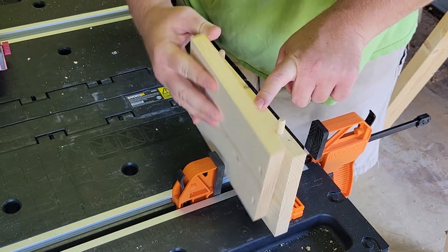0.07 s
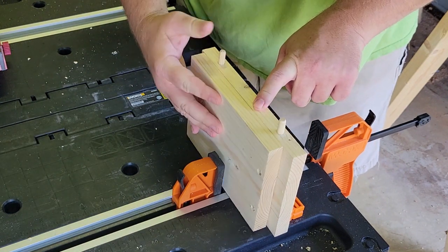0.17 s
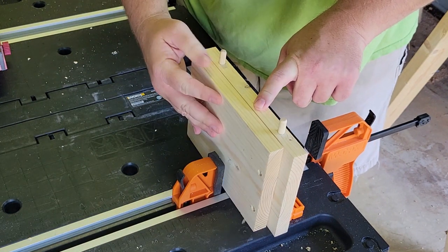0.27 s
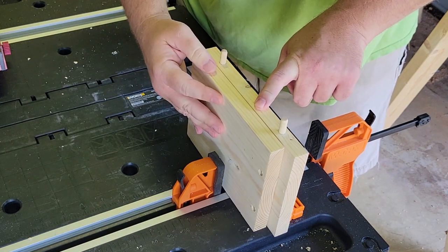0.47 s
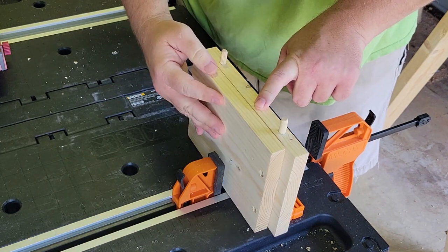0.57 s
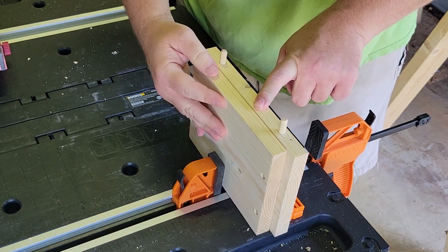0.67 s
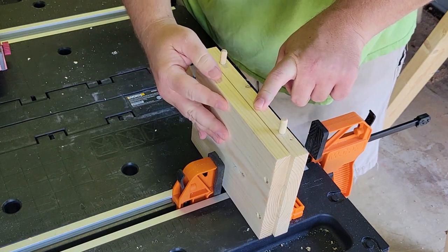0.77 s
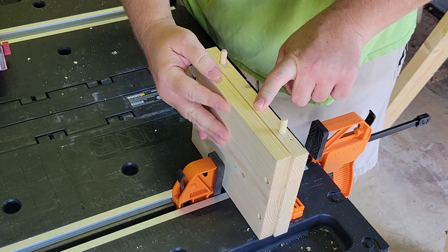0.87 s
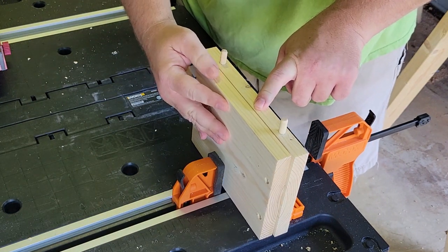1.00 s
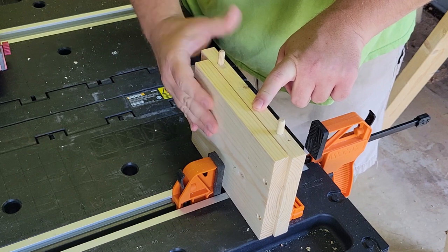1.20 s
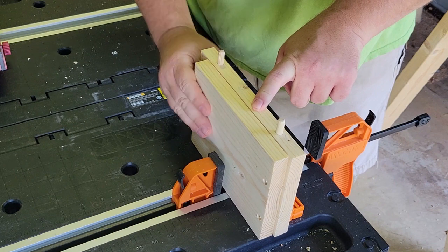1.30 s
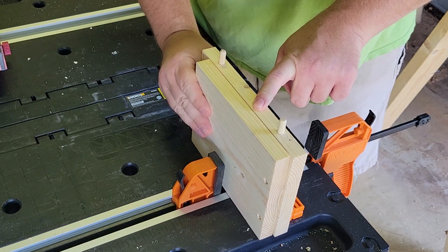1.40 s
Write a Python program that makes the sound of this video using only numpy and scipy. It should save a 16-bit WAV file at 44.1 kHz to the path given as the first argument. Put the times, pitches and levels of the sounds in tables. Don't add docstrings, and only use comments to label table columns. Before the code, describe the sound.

Wood knock: a softwood board slides briefly, hits on its corner, then claps flat on a bench

```python
import sys
import numpy as np
from scipy import signal
from scipy.fft import rfft, irfft
from scipy.io import wavfile
from scipy.ndimage import uniform_filter1d

SR = 44100
rng = np.random.default_rng(int(sys.argv[2]) if len(sys.argv) > 2 else 0)


def linear_from_db(decibels):
    return 10 ** (np.asarray(decibels, float) / 20)


def to_wav(sig):
    pcm = np.clip(np.atleast_2d(sig), -1, 1) * 32767
    pcm = np.round(pcm).astype(np.int16)
    wavfile.write(sys.argv[1], SR, pcm.T)


N = 63945

# frequency in Hz, likeness [0-1].
AIR_LIKENESS = [(60, 1), (240, 0.41), (950, 0.078), (3770, 0.0071), (15000, 1)]


def evened(x):
    return x / np.sqrt(np.mean(x ** 2) + 1e-20)


def read(points, hz):
    f, value = np.transpose(points)
    return np.interp(np.log(hz + 1), np.log(f + 1), value)


def curve(points):
    return linear_from_db(np.interp(np.arange(N) / SR, *np.transpose(points)))


def pair(likeness, colour, size=N):
    hz = np.fft.rfftfreq(size, 1 / SR)
    a, b = rfft(rng.standard_normal((2, size)))
    c = np.clip(read(likeness, hz), 0, 1)
    common, apart = np.sqrt((1 + c) / 2), np.sqrt((1 - c) / 2)
    spectra = np.array([common * a + apart * b, common * a - apart * b])
    return evened(irfft(spectra * linear_from_db(read(colour, hz)), size))


def resonate(x, hz, width_hz):
    r = np.exp(-np.pi * width_hz / SR)
    poles = [1, -2 * r * np.cos(2 * np.pi * hz / SR), r * r]
    once = signal.lfilter([1, 0, -1], poles, x)
    return signal.lfilter([1], poles, once)


def ring(modes, size):
    t = np.arange(size) / SR
    return sum(linear_from_db(db - 60 * t / t60_s) * np.sin(2 * np.pi * hz * t) for hz, db, t60_s in modes)


def rise(rise_s):
    return np.minimum(np.arange(SR) / SR / rise_s, 1)


def outdoors():
    # centre in Hz, width in Hz, level in dB.
    rumble = [(40.7, 7.6, -65.5), (76.1, 40, -55), (107, 24.22, -60.5), (134.1, 26, -71.5)]
    insects = [(2812, 830, -68), (6030, 2000, -74), (7280, 810, -70), (7770, 374, -71)]
    # frequency in Hz, level in dB.
    hiss_colour = [(150, 1.5), (300, -7), (700, -8.5), (1300, -10.5), (2000, -18.5), (4500, -23.5),
                   (8000, -29.5), (9500, -43)]
    top_colour = [(8000, -5), (9000, 0.5), (11300, -8), (13000, 0), (16000, 3.5)]
    hiss_db, top_db = -59, -91.5
    out = linear_from_db(hiss_db) * pair(AIR_LIKENESS, [(30, -32)] + hiss_colour + [(12000, -76.5)])
    out += linear_from_db(top_db) * pair(AIR_LIKENESS, [(6000, -50)] + top_colour)
    for hz, width_hz, db in rumble + insects:
        white = pair(AIR_LIKENESS, [(1, 0), (2, 0)])
        out += linear_from_db(db) * evened(resonate(white, hz, width_hz))
    return out


def throb():
    # time in seconds, level in dB, pitch in Hz.
    low_note = [(0.0, -70, 79.3), (0.052, -51, 75.55), (0.18, -56.5, 75.6), (0.218, -35, 78.7),
                (0.242, -40, 81.9), (0.302, -34, 84.64), (0.371, -53, 79.3), (0.417, -52, 78.4),
                (0.467, -74, 85.1), (0.63, -51, 80.74), (0.67, -55, 75.24), (0.727, -53, 73.8),
                (0.92, -57, 87.98), (0.992, -59, 77), (1.062, -53, 76.95), (1.186, -60.5, 73.63),
                (1.356, -49.5, 77.1), (1.45, -54, 78)]
    s, db, hz = np.transpose(low_note)
    turns = np.cumsum(np.interp(np.arange(N) / SR, s, hz)) / SR
    level = curve(list(zip(s, np.minimum(db, -40))))
    return np.sqrt(2) * level * np.sin(2 * np.pi * turns)


def fingers():
    # time in seconds, level in dB.
    strokes = [(.7, -100), (.84, -74), (.9, -89), (1.3, -103), (1.37, -76.5), (1.45, -74.5)]
    # frequency in Hz, level in dB.
    skin_colour = [(3000, -29), (8000, -3.5), (11000, -7.5), (13500, -5.5), (16000, -13.5)]
    return curve(strokes) * pair(AIR_LIKENESS, skin_colour)


def steadied(x):
    x = evened(x)
    return x / np.sqrt(abs(uniform_filter1d(x ** 2, size=500)) + 0.23)


def slide():
    # time in seconds, level in dB.
    pressure = [(.03, -82), (.06, -61.5), (.11, -51.5), (.145, -50.5), (.19, -49), (.215, -51.5),
                (.26, -50.5), (.315, -49), (.38, -78.5)]
    # frequency in Hz, width in Hz, level in dB, middle in seconds, span in seconds.
    grain = [(6130, 140, -11, .195, 0.014), (847, 130, -4.5, 0.11, 0.031), (1010, 150, 1.5, .168, .018),
             (1770, 100, -1, 0.119, 0.013), (2700, 72, -3, 0.11, 0.017), (2945, 48, -1.5, .14, .045),
             (3875, 310, -3, .185, .02), (5260, 80, -4.5, .11, .06), (5890, 150, -1, .165, 0.047),
             (9000, 200, -7, .16, .05), (10250, 200, -10.5, .14, .04), (12600, 250, -9, 0.14, .04),
             (14800, 220, -10, .135, .03)]
    # frequency in Hz, level in dB.
    scuff_colour = [(200, 1.5), (1000, -6), (2500, 3), (6000, -5.5), (10000, -5), (11300, -15),
                    (13000, -7.5), (16000, -11)]
    likeness, t = [(500, 0.97), (3000, 0.29), (12000, 0.75)], np.arange(N) / SR
    modes_db, grit_db, tilt = -52.0, 1.5, [[1.2], [-1.2]]
    modes = np.zeros((2, N))
    for hz, width_hz, db, middle_s, span_s in grain:
        swell = np.exp(-((t - middle_s) / span_s) ** 2)
        white = pair(likeness, [(1, 0), (2, 0)])
        modes += linear_from_db(db) * swell * steadied(resonate(white, hz, width_hz))
    grit = linear_from_db(grit_db * evened(uniform_filter1d(rng.standard_normal(N), size=60)))
    scuff = curve(pressure) * grit * pair(likeness, scuff_colour)
    return linear_from_db(modes_db) * modes + scuff * linear_from_db(tilt)


def garage():
    # frequency in Hz, left-right likeness [0-1].
    likeness = [(200, 0.86), (600, 0.56), (1500, 0.18), (4000, .3), (12000, .35)]
    # frequency in Hz, t60 in seconds.
    t60_table = [(100, 1), (300, 0.38), (1000, 0.47), (3000, 0.4), (8000, 0.38), (14000, 0.36)]
    # frequency in Hz, level in dB.
    late = [(100, -23.5), (300, -26.5), (800, -44.5), (2000, -45.5)]
    late_t60_s, gap_s, rise_s = 1.3, .003, 0.017
    colour = [(40, -44.5), (280, -7), (450, -2.5), (800, -8.5), (16000, -6.5)]
    hz, t, z = signal.stft(pair(likeness, colour, SR), SR, nperseg=256)
    first_decay = linear_from_db(-60 * t / read(t60_table, hz)[:, None])
    late_decay = linear_from_db(read(late, hz)[:, None] - 60 * t / late_t60_s)
    tail = signal.istft(z * (first_decay + late_decay), SR, nperseg=256)[1][:, :SR]
    tail = tail * np.clip((np.arange(SR) / SR - gap_s) / rise_s, 0, 1)
    return tail / np.linalg.norm(tail[0])


def knock(db, contact_s, crack_db, body):
    # frequency in Hz, level in dB.
    crack_colour = [(500, -20), (1500, -3), (2400, -1), (3300, 3), (3900, -8), (5500, -8), (9000, -19),
                    (16000, -28)]
    size, edge_share, crack_rise_s = 3000, .12, .0012
    small_hz, room_damp = 348, 0.24
    t = np.arange(size) / SR
    push = np.sin(np.pi * np.clip(t / contact_s, 0, 1))[:200] ** 2
    edge = np.exp(-((t[:200] - contact_s / 2) / .00004) ** 2) / 3
    push = push / push.sum() + edge_share * edge
    crack_decay = linear_from_db(crack_db - 60 * t / 0.013) + linear_from_db(crack_db - 8 - 60 * t / 0.11)
    crack = pair([(1, .8), (2, 0.22)], crack_colour, size=size)
    crack = crack * np.minimum(t / crack_rise_s, 1) * crack_decay
    sheds = signal.butter(2, small_hz, "high", fs=SR)
    sounds = []
    for damp in (1, room_damp):
        modes = [(hz, mode_db, t60_s * damp) for hz, mode_db, t60_s in body]
        thud = signal.lfilter(*sheds, -np.convolve(push, ring(modes, size=size))[:size])
        sounds.append(linear_from_db(db) * (thud / abs(thud).max() + crack))
    return sounds


def knocks():
    # start in seconds, strength in dB, contact time in seconds, crack in dB, room share in dB.
    contacts = [
        (0.1979, -24.5, 0.00035, -42.5, 16.5),
        (0.2135, -4.5, 0.0015, -21, -2),
        (0.217, -9, 0.00096, -12, -4.5),
        (0.2667, 0, 0.0012, -20.5, -4.5),
        (.2762, -24, .0007, -2, -2),
        (0.282, -17.5, 0.00061, -20, 4.5),
        (0.286, -16.5, 0.00025, -18, 7),
    ]
    landing = [2, 0, 0, 1, 0, 1, 1]
    bench_share = [-1, -1, -5.5, -5, 1, -0.5, -1.5]
    # frequency in Hz, level in dB, t60 in seconds.
    corner = [(150.5, -0.5, 0.025), (265, -10, .04), (520, -18, 0.04), (670, -8, 0.021), (1050, -8.5, 0.03),
              (1170, -11.5, 0.03), (1980, -7.5, 0.04), (2460, -5, 0.023), (2842, -9, 0.034),
              (3000, -7.5, 0.012), (4156, -30.5, .02), (5362, -25.5, .03)]
    flat = [(173, -2, 0.0298), (343, -6, 0.022), (502, 1.5, 0.0086), (700, -5.5, 0.034), (778, -12, 0.019),
            (1034, -3, 0.019), (1357, 0, 0.019), (1850, -2, 0.016), (2612, -21.5, .02), (3340, -13.5, .02),
            (3400, -21, 0.026), (5250, -22.5, .03)]
    touch = [(420, 2.5, .03), (711, -13.5, .03), (1380, 39, 0.008), (2660, -14.5, 0.018),
             (3900, -23.5, .01)]
    bench = [(64, -15.5, 0.082), (88.8, -18, 0.47), (115.7, -24.5, 0.54), (165.2, -10, 0.35),
             (227.6, -30, 0.5), (273.4, -27, 0.4), (286.9, -13, 0.54), (340.6, -2, 0.177),
             (423.6, -16.5, 0.4), (463, -7, 0.38), (555, -13.5, 0.095), (682, -8, 0.33), (804, -12.5, 0.34)]
    earlier_bench = [(285, -36.5, 0.14), (640, -51.5, 0.18), (1860, -51.5, 0.14)]
    seated = [(286.2, -18, 0.51), (347, -18, .22), (458, -23.5, .3), (568, -33.5, 0.271), (793, -19, .12),
              (891, -29, .35), (1022, -33.5, 0.12), (1151, -29.5, .26), (1370, -27, .12),
              (1495, -27, 0.073), (1944, -26, .1), (2590, -38, .1), (3090, -30, .08), (3425, -39, 0.061)]
    earlier_s, earlier_db = 0.055, -25.5
    lead, room = round(earlier_s * SR), garage()
    out = np.zeros((2, N + lead + SR + 4000))
    rows = [(-earlier_s, earlier_db, .0004, -12, 0)] + contacts
    for row, kind, bench_db in zip(rows, [0] + landing, [-4] + bench_share):
        s, db, contact_s, crack_db, room_db = row
        near, to_room = knock(db, contact_s, crack_db, (corner, flat, touch)[kind])
        at = round(s * SR) + lead
        wet = linear_from_db(room_db) * signal.fftconvolve(to_room, room, axes=1)
        out[:, at:at + wet.shape[1]] += wet
        out[:, at:at + near.shape[1]] += near * linear_from_db([[-.3], [.3]])
        out[:, at:at + SR] -= linear_from_db(db + bench_db - 14.0) * rise(0.0013) * ring(bench, size=SR)
    seat = round(contacts[3][0] * SR) + lead
    out[:, seat:seat + SR] -= rise(.003) * ring(seated, size=SR) * linear_from_db([[.8], [-.8]])
    out[:, lead:lead + SR] += ring(earlier_bench, size=SR)
    return out[:, lead:lead + N]


def scene():
    return outdoors() + throb() + fingers() + slide() + knocks()


def band_limit(x):
    return signal.sosfilt(signal.butter(12, 16470, fs=SR, output="sos"), x)


def record(dry):
    bass_cut_hz, ceiling, edge_hz = 32, .97, 15850
    dry = signal.lfilter(*signal.butter(2, bass_cut_hz, "high", fs=SR), dry)
    held = dry / (1 + (abs(dry) / ceiling) ** 4) ** (1 / 4)
    edge = signal.firwin(511, edge_hz, window=("kaiser", 8), fs=SR)
    return band_limit(signal.oaconvolve(held, edge[None], "same"))


dry = scene()
out = record(dry)
to_wav(out)
```